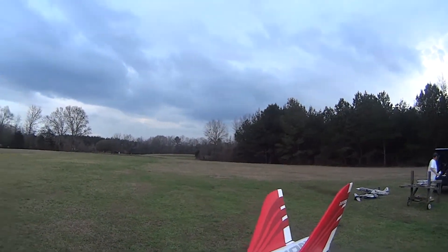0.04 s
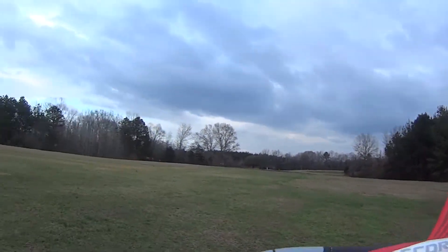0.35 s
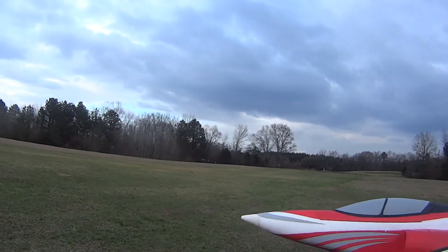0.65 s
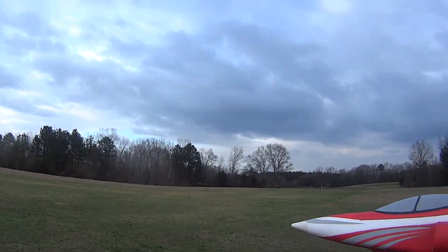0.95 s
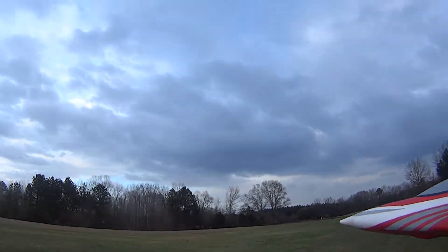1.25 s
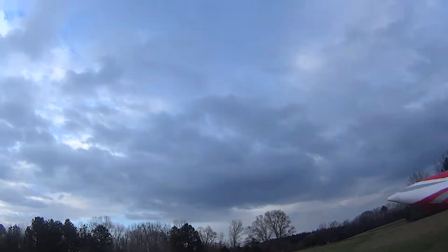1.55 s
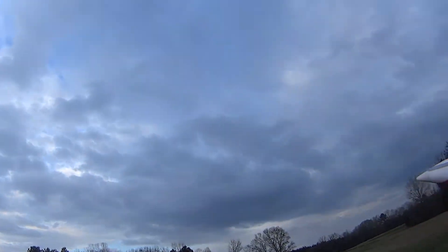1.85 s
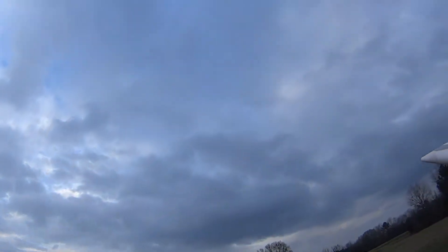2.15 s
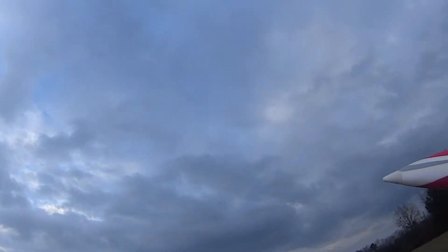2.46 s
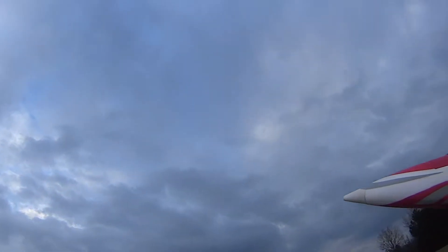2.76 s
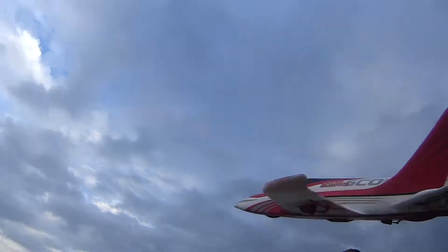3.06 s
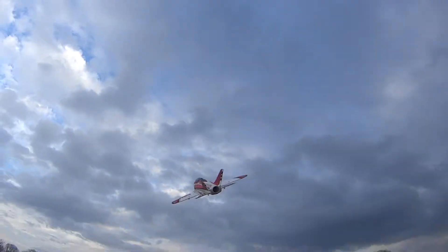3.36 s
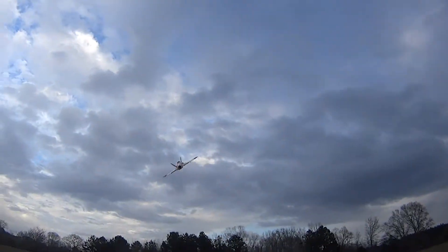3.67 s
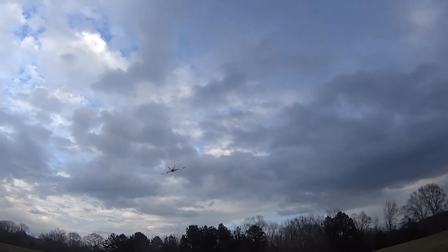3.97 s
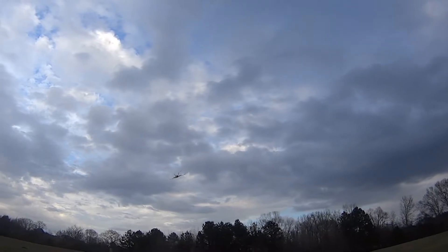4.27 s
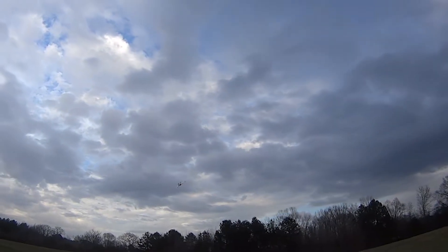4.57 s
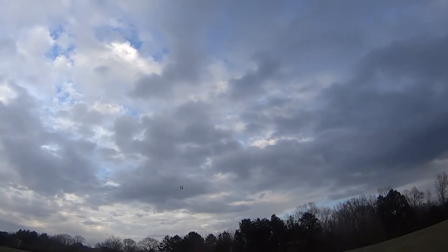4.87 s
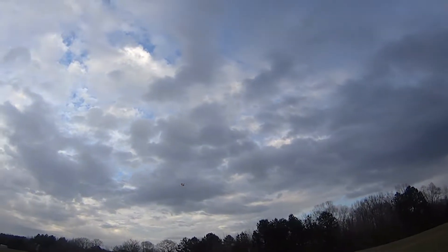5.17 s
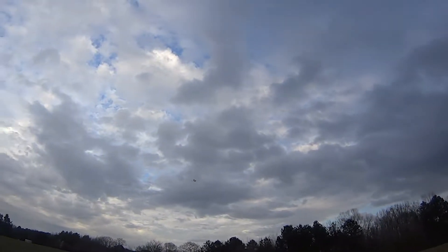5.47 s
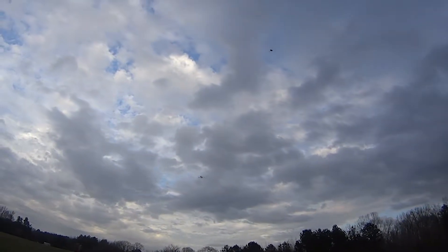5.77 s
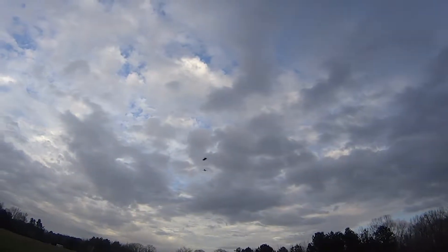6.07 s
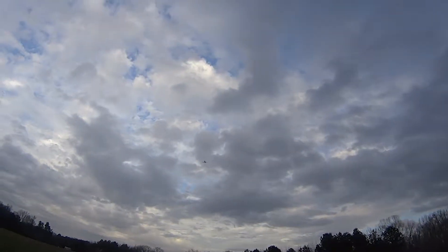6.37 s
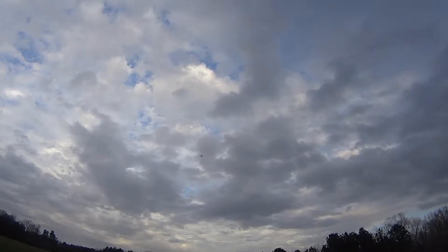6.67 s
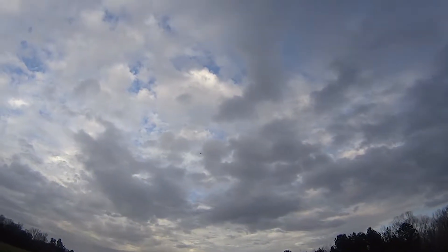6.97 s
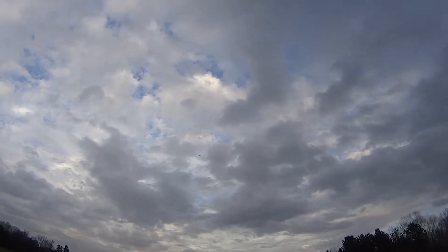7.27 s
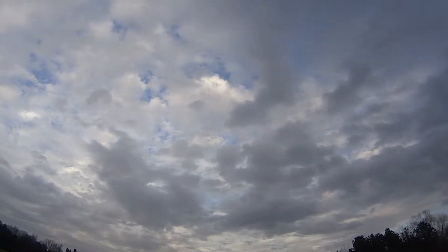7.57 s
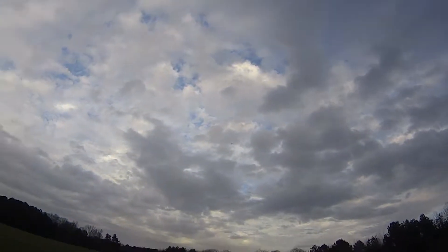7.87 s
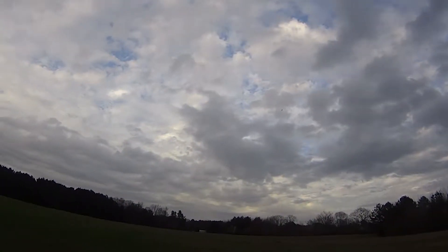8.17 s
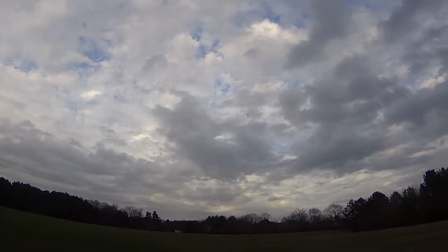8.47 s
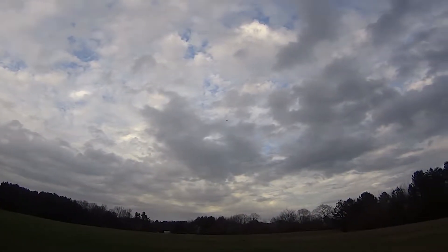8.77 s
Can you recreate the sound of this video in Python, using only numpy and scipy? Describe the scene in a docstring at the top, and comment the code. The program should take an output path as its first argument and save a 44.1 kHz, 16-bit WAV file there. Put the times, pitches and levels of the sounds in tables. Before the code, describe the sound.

On an open grass field, hands rustle and click briefly over soft outdoor air. Right beside the microphone, a model jet's electric motor chirps and stutters, then its fan winds up quickly to a loud, high whistle with a hum and rushing air. It is thrown with two knocks and a puff of wind. The whine fades as the jet flies away, wavering and slowly dropping in pitch.

```python
"""An open grass field, where an electric ducted-fan model jet is hand-launched beside the microphone.
Hands rustle over soft outdoor air. The motor chirps, stutters and spools up: chopping blades whistle,
the rotor hums, and turbulent air rushes from the duct. The jet leaves with a knock and a puff of wake.
As it flies off the pitch sags, and the bounce off the grass sweeps a slow comb through the rush."""
import sys
import numpy as np
from scipy import signal
from scipy.fft import rfft, irfft, next_fast_len
from scipy.io import wavfile
from scipy.ndimage import uniform_filter1d

SR = 44100
rng = np.random.default_rng(int(sys.argv[2]) if len(sys.argv) > 2 else 0)


def materialize(psi):
    """Save the field psi as 16-bit PCM at rate SR to the path in sys.argv[1].

    A 1-D psi becomes a single channel; in a 2-D psi each row is a channel.
    """
    bounded = np.clip(np.atleast_2d(psi).T, -1, 1)
    quanta = np.round(bounded * 32767).astype(np.int16)
    wavfile.write(sys.argv[1], SR, quanta)


N = 393372

# tone of the still air (frequency [Hz], relative level [dB])
FIELD_COLOUR = [(15, -33), (25, -3.5), (48, -5.5), (92, -5), (260, -7.5), (327, -7.5), (433, -8),
                (518, -9.5), (603, -8.5), (778, -9.5), (1080, -2.5), (2050, -8.5), (9680, -19),
                (11000, -18.5), (14300, -58), (22000, -120)]
# its stereo spread (frequency [Hz], side minus mid [dB])
FIELD_SPREAD = [(60, -16), (110, -7), (190, -2), (340, 2), (610, 7), (1090, 0), (1950, 0.5), (3470, 2),
                (6200, -2.5), (11100, -2)]
# rustles, clicks and knocks (time [s], peak [dB], centre [Hz], width [Hz], t60 [s])
HANDLING_HITS = [(0, -22, 4300, 6200, 0.076), (0.022, -31, 3600, 4500, 0.095),
                 (0.067, -42, 4000, 4500, 0.12), (.102, -43, 4480, 3500, .015),
                 (.452, -48, 6500, 3000, .012), (.485, -23, 2460, 2920, 0.016),
                 (0.484, -29.5, 7300, 6000, 0.0071), (0.547, -43.5, 1200, 400, .03),
                 (.71, -35.5, 4070, 4500, 0.0081), (0.79, -36, 3200, 3500, 0.015),
                 (2.981, -17.5, 1190, 2200, .02), (3.149, -13.5, 1480, 1980, 0.037),
                 (6.039, -39.5, 1320, 300, .07), (7.086, -47.5, 1070, 200, 0.11),
                 (7.585, -47, 780, 400, .04)]

START_S, CREEP_S, SPOOL_S = 1.71, (1.87, 2.16), (2.182, 2.546)  # throttle cues; pairs are (from, to)
LOAD_ON_S, LOAD_OFF_S = (2.155, 2.182), (2.316, 2.35)  # the motor pulls hard to speed up the fan
STUTTER_OFF_S = (2.05, 2.5)  # the motor locks in step
# full-throttle pitch as heard, sagging as the jet speeds away (time [s], shaft rate [Hz])
FULL_SHAFT_HZ = [(2.6, 540), (3, 536.5), (3.2, 526.7), (3.47, 521.5), (3.85, 515.7), (4.25, 513),
                 (4.5, 508), (4.72, 505), (5.45, 500), (6, 497.6), (6.7, 496.3), (7.3, 492.7),
                 (8.65, 486.7)]
# partials of the magnetic whine (multiple of the shaft rate)
WHINE_ORDERS = [18, 24, 36, 48]
# mix of those partials (idling [dB], under load [dB])
WHINE_LEVELS = [(-65, -41.5), (-78.5, -48), (-69.5, -60), (-68, -75)]
# first kicks of current (time [s], level [dB])
CURRENT_KICKS = [(1.743, -34), (1.75, -31)]
# tones of the kicked windings (frequency [Hz], relative level [dB])
WINDING_TONES = [(1430, -21), (2600, -14), (3200, -4.5), (4720, -16), (7050, -14)]
# resonances of the duct (centre [Hz], width [Hz], relative level [dB])
DUCT_MODES = [(740, 170, -1), (1480, 220, -1), (2130, 220, -3), (2850, 600, -6), (4100, 700, -16)]

# five stages: held close, just thrown, running out low, climbing, far off (from [s], to [s])
FLIGHT_STAGES = [(1.7, 3.014), (3.21, 3.45), (3.56, 4.3), (4.88, 6.85), (7.12, 8.92)]
# perspective per stage (aspect [0 beside, 1 behind, 2 low run, 3 far], left minus right [dB], width [0-1])
STAGE_PERSPECTIVE = [(0, -5, 0.5), (1, -2.5, 0.24), (2, -1, 0.22), (3, -1.4, .12), (3, -1.9, 0.15)]
# shared fader for whistle and rush (time [s], level [dB])
JET_FADER = [(2.45, -24), (2.56, -24), (2.68, -25.5), (2.92, -25.5), (3.13, -23), (3.28, -28),
             (3.35, -27.5), (4.07, -46.5), (4.72, -46.5), (4.92, -40), (5.49, -42.5), (6.48, -42),
             (6.59, -41), (7.17, -47.5), (8.63, -50.5), (8.92, -49)]
# whistle per stage (level over the fader [dB], unsteadiness [0-1], ground echo [0-1])
WHISTLE_MIX = [(4, 0.21, 0.16), (12.5, .06, .03), (3, 0.57, 0.55), (9.5, 0.04, .03), (2.5, 0.02, 0)]
# swells and dips in the whistle's loudness as the jet flies (time [s], gain [dB], half length [s])
WHISTLE_SWELLS = [(2.205, -11, .03), (2.306, 3.5, 0.022), (2.35, -5, 0.017), (2.445, 4, 0.044),
                  (2.62, -6.5, 0.065), (2.756, 0.5, 0.045), (3.137, -12, 0.069), (3.527, -4, 0.079),
                  (4.53, 6, 0.045), (4.95, 4, 0.16), (5.522, -3.5, 0.094), (5.81, -7.5, 0.072),
                  (8.18, 7, .14), (8.82, 7.5, 0.22)]
# hum per stage (level [dB], relative octave [dB], relative buzz [dB])
HUM_MIX = [(-32, -10, 0.5), (-60, 3.5, 12), (-64.5, 1, 7), (-69.5, -2, 4.5), (-76.5, -11, 0)]
# the hum swells through the duct's resonance (share of full speed [0-1], gain [dB], octave gain [dB])
HUM_SWELL = [(.25, -48, 0), (.46, -11, -6), (.66, -1, -12), (.86, 8, 1), (.96, -1, 16.5), (1, 0.5, -0.5)]
# overtones of the buzz (multiple of the shaft rate, relative level [dB])
BUZZ_PARTIALS = [(3, -10), (4, -7), (5, -7.5), (6, -14), (7, -12), (8, -13), (9, -17), (11, -13)]
# rush per stage (low roar over the fader [dB], top hiss over the fader [dB])
RUSH_MIX = [(-10.5, -4), (-16, -1), (-11, -6), (-16.5, -4), (-14, -8.5)]
# tone of the rush from each aspect (frequency [Hz], relative level [dB])
RUSH_BESIDE = [(100, -36), (300, -26), (700, -17), (1000, -10), (1300, -8), (1800, -10), (2800, -6),
               (3700, -5), (4400, -6), (6100, 0), (7900, -7), (8800, -17), (10100, -19), (10900, -17)]
RUSH_BEHIND = [(200, -36), (700, -26), (1000, -14), (1500, -12), (1900, -13), (2400, -11), (2900, -4),
               (3550, -2), (4200, -7), (5200, -2), (7400, -3), (8800, -13), (10100, -14), (10900, -11)]
RUSH_LOW_RUN = [(200, -37), (700, -27), (1000, -11), (1500, -10.5), (2000, -13), (2500, -6.5), (2950, 0.5),
                (3550, -1.5), (4300, -9), (5200, -4), (6500, -4), (7400, -4.5), (8800, -14.5),
                (10100, -15.5), (10900, -15)]
RUSH_FAR = [(500, -22), (900, -16), (1400, -9), (2000, -14), (2500, -8), (2950, -1), (3550, 0), (4300, -6),
            (5200, -1.5), (6500, -2), (7400, -5), (8800, -13), (10100, -18), (10900, -15)]
# the jet's angle above the horizon (time [s], elevation [degrees])
JET_ELEVATION = [(2.9, 66), (3.6, 38.8), (4, 29.2), (4.4, 23.3), (4.8, 20.1), (5.4, 20.1), (6.1, 22.8),
                 (7, 27.8), (7.6, 29.2), (8.9, 26)]
# peaks and notches of the microphone port (centre [Hz], width [Hz], gain [dB])
PORT_EQ = [(624, 72, -6), (1313, 160, 5), (1582, 115, 4.5), (1730, 140, -5.5), (2485, 44, 4.5),
           (2420, 61, -5), (3380, 62, -2), (3463, 150, 5), (9540, 170, 5.5), (10000, 450, -7),
           (10060, 220, 3.5)]
# puffs of air on the microphone (time [s], rms at the crest [dB], half length [s], low [Hz], high [Hz])
AIR_PUFFS = [(2.982, -31, 0.0085, 72, 170), (3.104, -42, 0.026, 18, 140), (3.148, -37.5, 0.0056, 190, 452),
             (3.158, -43, 0.012, 20, 150), (3.949, -64, 0.18, 31, 181), (7.95, -58, .08, 16, 60)]


def undb(db):
    """Decibels to gain."""
    return 10 ** (np.asarray(db) / 20)


def times():
    """Time of every sample."""
    return np.arange(N) / SR


def curves(table):
    """One automation lane per column, in straight lines between the cue times."""
    cues, *columns = np.transpose(table)
    return [np.interp(times(), cues, column) for column in columns]


def staged(table):
    """Lanes that hold through each flight stage and glide to the next."""
    return curves(np.column_stack([np.ravel(FLIGHT_STAGES), np.repeat(table, 2, axis=0)]))


def ease(from_s, to_s):
    """A smooth fade from 0 to 1."""
    u = np.clip((times() - from_s) / max(to_s - from_s, 1 / SR), 0, 1)
    return u * u * (3 - 2 * u)


def bell(x, centre, half):
    """A bell curve, down to 1/e at centre +/- half."""
    return np.exp(-((x - centre) / half) ** 2)


def unit(x):
    """Scale to rms 1."""
    return x / np.sqrt(np.mean(x ** 2))


def colour(x, points):
    """EQ through (frequency [Hz], gain [dB]) points."""
    hz, db = np.transpose(points)
    size = next_fast_len(N)
    bins_hz = np.maximum(np.fft.rfftfreq(size, 1 / SR), 1)
    gain = undb(np.interp(np.log(bins_hz), np.log(hz), db))
    return irfft(rfft(x, size) * gain, size)[..., :N]


def band(x, lo_hz, hi_hz, order=2):
    """Band-pass."""
    sos = signal.butter(order, [lo_hz, min(hi_hz, SR / 2 - 1)], "band", fs=SR, output="sos")
    return signal.sosfilt(sos, x)


def walk(rate_hz):
    """Smooth random modulation at rms 1."""
    hold = int(SR / rate_hz)
    steps = np.repeat(rng.standard_normal(N // hold + 1), hold)
    return unit(uniform_filter1d(uniform_filter1d(steps, hold), hold)[:N])


def ears(mid, side):
    """Left and right from mid and side."""
    return np.array([mid + side, mid - side])


def field(level_db=-59, lift_db=2.5):
    """A wide, soft bed of outdoor air, a little stronger once the jet has left."""
    mid, side = unit(colour(rng.standard_normal((2, N)), FIELD_COLOUR))
    swell_db = .5 * walk(4.7) + lift_db * np.clip((times() - 4) / 2, 0, 1)
    return undb(level_db + swell_db) * ears(mid, colour(side, FIELD_SPREAD))


def handling(spread=0.3):
    """Handling noise: dry, quickly damped bursts."""
    out, t = np.zeros((2, N)), np.arange(SR // 5) / SR
    for at_s, db, hz, width_hz, t60 in HANDLING_HITS:
        lo_hz = np.hypot(hz, width_hz / 2) - width_hz / 2
        decay = np.exp(-np.log(1000) * t / t60)
        mid, side = band(rng.standard_normal((2, len(t))) * decay, lo_hz, lo_hz + width_hz)
        start = int(at_s * SR)
        out[:, start:start + len(t)] += undb(db) * ears(mid, spread * side) / abs(mid).max()
    return out


def throttle(idle=.076, creep=.19):
    """Share of full speed: idle, a short creep, then a spool-up that slackens as air drag grows."""
    spooled = np.clip((times() - SPOOL_S[0]) / (SPOOL_S[1] - SPOOL_S[0]), 0, 1)
    share = idle + (creep - idle) * ease(*CREEP_S) + (1 - creep) * np.sin(np.pi / 2 * spooled)
    return uniform_filter1d(share, SR // 50)


def duct_gain(hz, boost_db=16):
    """A tone blooms where it crosses a resonance of the duct."""
    return 1 + sum(undb(boost_db + db) * bell(hz, centre, width / 2) for centre, width, db in DUCT_MODES)


def motor_whine(turn, shaft_hz, load, flutter_db=3):
    """Rough magnetic whine: it rings the duct at idle and bites under load."""
    idling = ease(START_S, START_S + .13) * (1 - ease(*STUTTER_OFF_S))
    out = 0
    for order, (idle_db, load_db) in zip(WHINE_ORDERS, WHINE_LEVELS):
        gain = idling * undb(idle_db) * duct_gain(order * shaft_hz) + load * undb(load_db)
        out += gain * undb(flutter_db * walk(70)) * np.sin(order * turn + .9 * walk(260))
    return np.sqrt(2) * out


def stutter(turn, blade_hz, level_db=-48.5, uneven_db=3):
    """Uneven jolts, two a turn, rasp through the duct; resonances below the blade rate die away."""
    decay = np.exp(-(turn / np.pi % 1) / .56)
    jolts = rng.standard_normal(N) * decay * undb(uneven_db * walk(90))
    rings = [undb(db) * band(jolts, hz - width / 2, hz + width / 2) for hz, width, db in DUCT_MODES]
    rasp = sum(ring * np.minimum(hz / blade_hz, 1) ** 2 for ring, (hz, _, _) in zip(rings, DUCT_MODES))
    return undb(level_db) * (1 - ease(*STUTTER_OFF_S)) * rasp / np.std(sum(rings))


def winding_chirps():
    """The first kicks of current make the windings chirp."""
    t = times()
    kicks = sum(undb(db) * bell(t, at_s, .0025) for at_s, db in CURRENT_KICKS)
    return kicks * sum(undb(db) * np.sin(2 * np.pi * hz * t) for hz, db in WINDING_TONES)


def controller(load, level_db=-36.5, start_hz=7795, sag_hz_per_s=550):
    """The speed controller's thin switching tone, sagging under load."""
    hz = start_hz - sag_hz_per_s * (times() - LOAD_ON_S[0])
    return np.sqrt(2) * load * undb(level_db) * np.sin(2 * np.pi * np.cumsum(hz) / SR)


def whistle_ride(rock_s=6.44, rock_half_s=.42, rock_hz=5, rock_db=2.5, wander_db=.54):
    """Gain ride in dB: the whistle swells and dips, and pulses as the wings rock in the climb."""
    t = times()
    swells_db = sum(db * bell(t, at_s, half_s) for at_s, db, half_s in WHISTLE_SWELLS)
    rocking = np.exp(-((t - rock_s) / rock_half_s) ** 4) * np.cos(2 * np.pi * rock_hz * (t - rock_s))
    return swells_db + rock_db * rocking + wander_db * walk(7)


def whistle(blade_phase, speed, load, width, db_per_decade=35.5, waver_db=.5, skirt=.024):
    """Blades chop the inflow; eddies make the tone waver and give it a narrow skirt of noise."""
    fader_db, = curves(JET_FADER)
    stage_db, eddies, _ = staged(WHISTLE_MIX)
    level_db = fader_db + stage_db + whistle_ride() + db_per_decade * np.log10(speed)
    eddies = eddies + .34 * load
    swing = 1 + eddies * (walk(90) + 1j * walk(90)) + skirt * (walk(260) + 1j * walk(260))
    tone = swing * np.exp(1j * blade_phase) / np.sqrt(1 + 2 * eddies ** 2)
    # close by, the tone reaches left and right out of step
    side = width * (1.07 + .39 * walk(9.1)) * tone.real
    stereo = ears(tone.imag, -side) / np.hypot(1, 1.15 * width)
    return np.sqrt(2) * undb(level_db + waver_db * walk(28)) * stereo


def hum(turn, speed, lead_rad=.46, flutter_db=1.5, buzz_db_per_decade=50):
    """Unequal blades sound multiples of the shaft rate; the overtones flutter more than the root."""
    level_db, octave_db, buzz_db = staged(HUM_MIX)
    share, *swells = np.transpose(HUM_SWELL)
    swell_db, octave_swell_db = (np.interp(speed, share, column) for column in swells)
    root = undb(flutter_db * walk(22.96)) * np.sin(turn + np.array([[-lead_rad], [lead_rad]]))
    octave = undb(octave_db + octave_swell_db + 2 * walk(22.07)) * np.sin(2 * turn)
    buzz = sum(undb(db + 2.5 * walk(22)) * np.sin(order * turn + rng.uniform(0, 2 * np.pi))
               for order, db in BUZZ_PARTIALS)
    buzz_gain = undb(buzz_db + buzz_db_per_decade * np.log10(speed))
    return np.sqrt(2) * undb(level_db) * (undb(swell_db) * (root + octave) + buzz_gain * buzz)


def rush(speed, aspect, width, db_per_decade=34.5, flicker_db=.69, core_db=-.61):
    """Turbulent exhaust: its colour turns with aspect, and roar, core and hiss each flicker."""
    decades = np.log10(speed)
    level_db = curves(JET_FADER)[0] + db_per_decade * decades
    roar_db, hiss_db = staged(RUSH_MIX)
    noise = rng.standard_normal((2, N))
    air = sum(np.maximum(1 - abs(aspect - k), 0) * colour(noise, [(40, -55)] + spectrum)
              for k, spectrum in enumerate([RUSH_BESIDE, RUSH_BEHIND, RUSH_LOW_RUN, RUSH_FAR]))
    roar = colour(air, [(1800, 0), (2200, -6), (2800, -40)])
    hiss = colour(air, [(5500, -40), (6700, -6), (7600, 0)])
    layers = [(roar, (700, 2000), roar_db - 22 * decades),  # a slower fan is duller
              (air - roar - hiss, (2500, 5400), core_db),
              (hiss, (6900, 11000), hiss_db + 14 * decades)]
    out = 0
    for layer, edges_hz, db in layers:
        power = uniform_filter1d(band(air[0], *edges_hz, order=4) ** 2, SR // 4)
        out += layer / np.sqrt(power) * undb(level_db + db + flicker_db * walk(25))
    return ears(out[0], width * out[1])


def grass(mic_height_m=1.6, sound_m_s=343, grazing_deg=20):
    """Lag and strength of the ground bounce; grass reflects best at a grazing angle."""
    degrees, = curves(JET_ELEVATION)
    lag_s = 2 * mic_height_m * np.sin(np.radians(degrees)) / sound_m_s
    return lag_s, .74 * (grazing_deg / degrees) ** 1.5


def ground_comb(x, lag_s, strength, edge_hz=None):
    """Direct sound plus its bounce off the grass, which scatters the top above edge_hz, if given."""
    read_at = (times() - uniform_filter1d(lag_s, SR // 5)) * SR
    source = x if edge_hz is None else colour(x, [(edge_hz, 0), (2 * edge_hz, -12)])
    echo = np.array([np.interp(read_at, np.arange(N), channel) for channel in source])
    return (x + strength * echo) / np.sqrt(1 + strength ** 2)


def port(x):
    """The microphone port adds narrow peaks and dips."""
    hz = np.arange(1, SR // 2, 10)
    eq_db = sum(db * bell(hz, centre, width / 2) for centre, width, db in PORT_EQ)
    return colour(x, np.transpose([hz, eq_db]))


def jet(blades=12, air_lag_db=-4):
    """All voices of motor and fan, driven by one throttle and panned along the flight."""
    speed = throttle()
    shaft_hz = speed * uniform_filter1d(curves(FULL_SHAFT_HZ)[0], SR // 30)
    turn = 2 * np.pi * np.cumsum(shaft_hz) / SR
    aspect, pan_db, width = staged(STAGE_PERSPECTIVE)
    lag_s, bounce = grass()
    whistle_bounce = staged(WHISTLE_MIX)[-1]
    powered, blowing = ease(START_S, START_S + .043), ease(*LOAD_ON_S)
    load = blowing * (1 - ease(*LOAD_OFF_S))
    motor = motor_whine(turn, shaft_hz, load) + stutter(turn, blades * shaft_hz)
    motor += winding_chirps() + controller(load)
    fan = ground_comb(whistle(blades * turn, speed, load, width), lag_s, whistle_bounce)
    fan += ground_comb(hum(turn, speed), lag_s, bounce)
    air = port(ground_comb(rush(speed, aspect, width), lag_s, bounce, edge_hz=5000))
    air *= undb(air_lag_db * load)  # the air lags behind the blades at throttle-up
    pan = undb(np.array([pan_db, -pan_db]) / 2)
    return (powered * motor + blowing * (fan + air)) * pan / np.sqrt(np.mean(pan ** 2, axis=0))


def buffets(spread=.27):
    """The jet's wake, and later a light breeze, thump the microphone."""
    out = np.zeros((2, N))
    for at_s, db, half_s, lo_hz, hi_hz in AIR_PUFFS:
        window = bell(np.arange(SR) / SR, .5, half_s)
        puff = band(rng.standard_normal((2, SR)), lo_hz, hi_hz) * window
        puff *= np.sqrt(np.sum(window ** 2) / np.sum(puff ** 2, axis=1, keepdims=True))
        start = int((at_s - .5) * SR)
        out[:, start:start + SR] += undb(db) * ears(puff[0], spread * puff[1])
    return out


def scene():
    """Jet, handling and wake over the bed of field air."""
    return jet() + handling() + buffets() + field()


def record(dry):
    """A steep high cut near 11 kHz."""
    return signal.sosfilt(signal.ellip(12, .2, 80, 11020, fs=SR, output="sos"), dry)


dry = scene()
out = record(dry)
materialize(out)
```